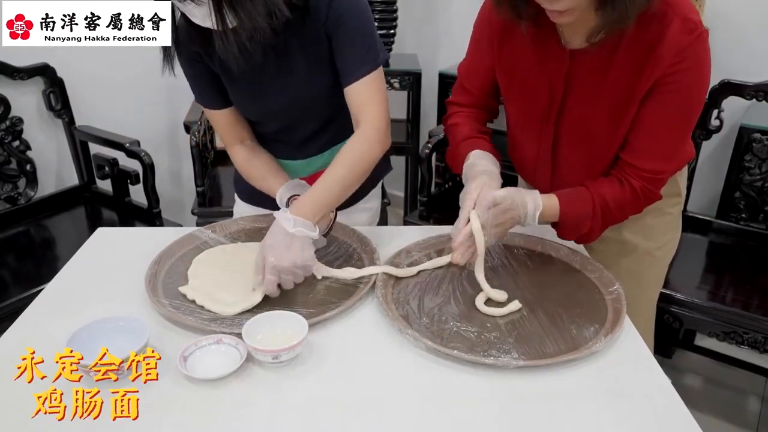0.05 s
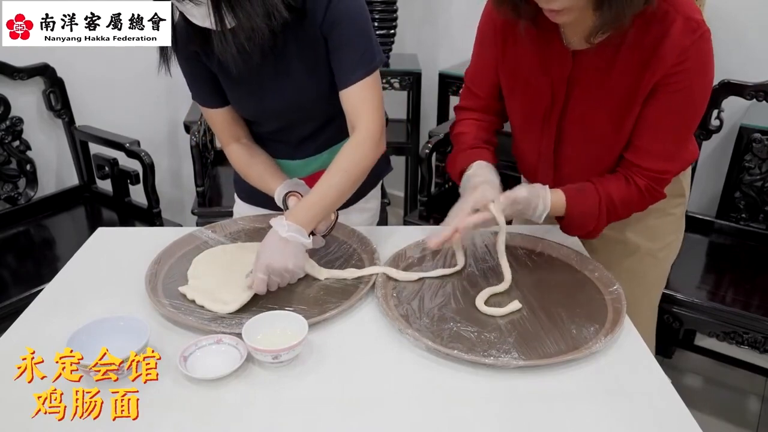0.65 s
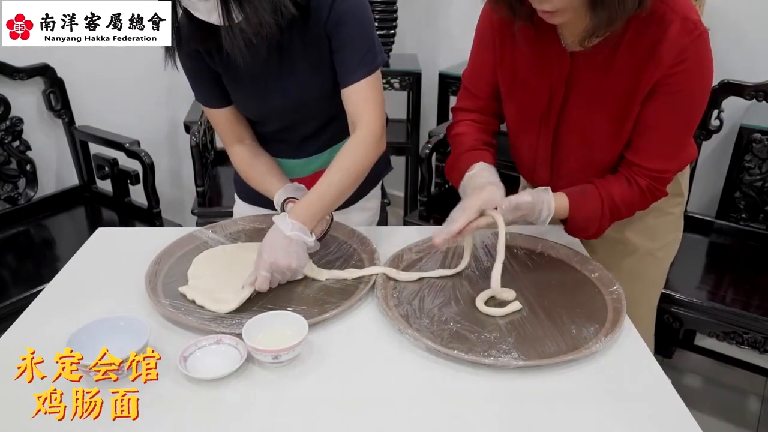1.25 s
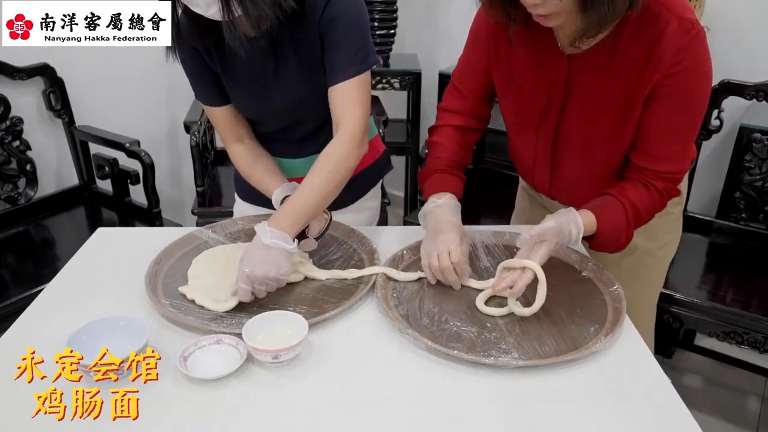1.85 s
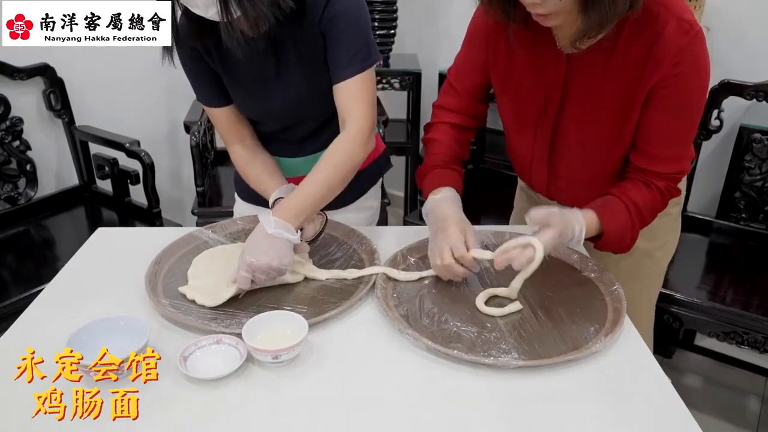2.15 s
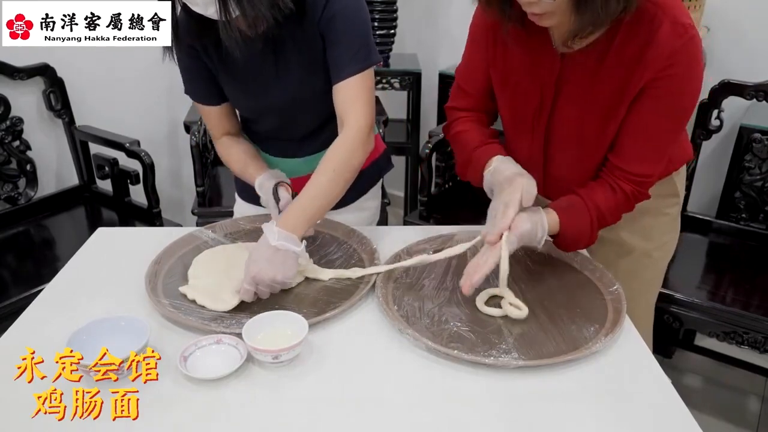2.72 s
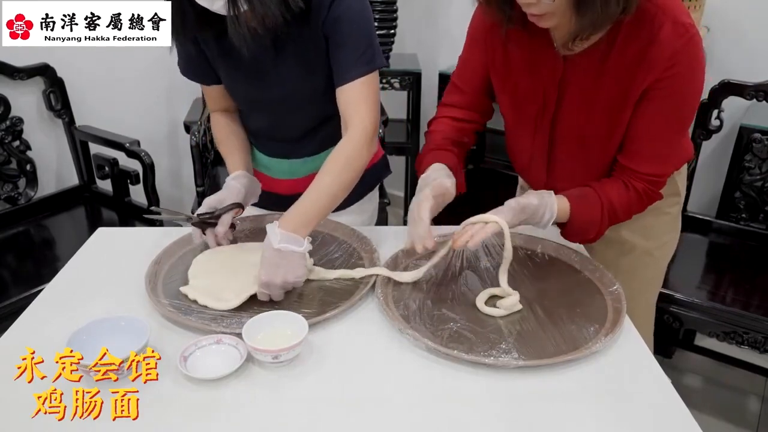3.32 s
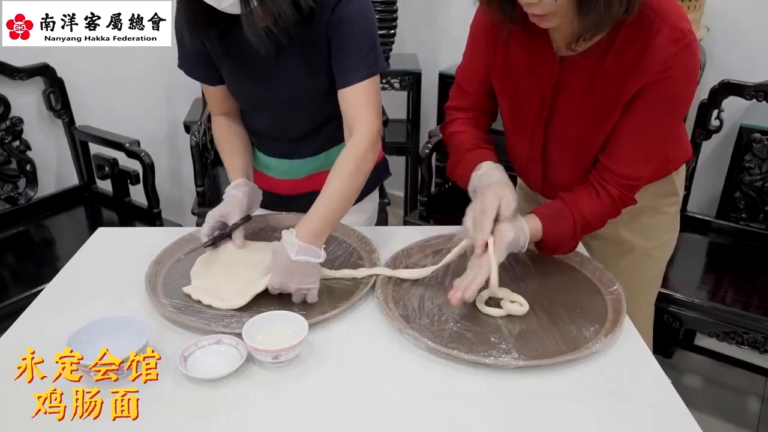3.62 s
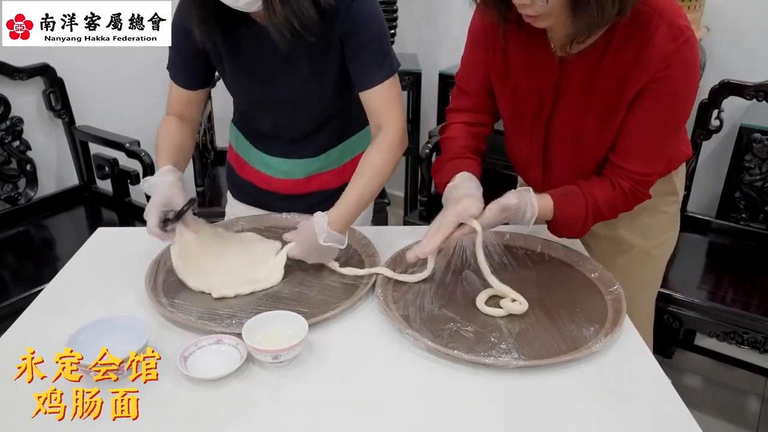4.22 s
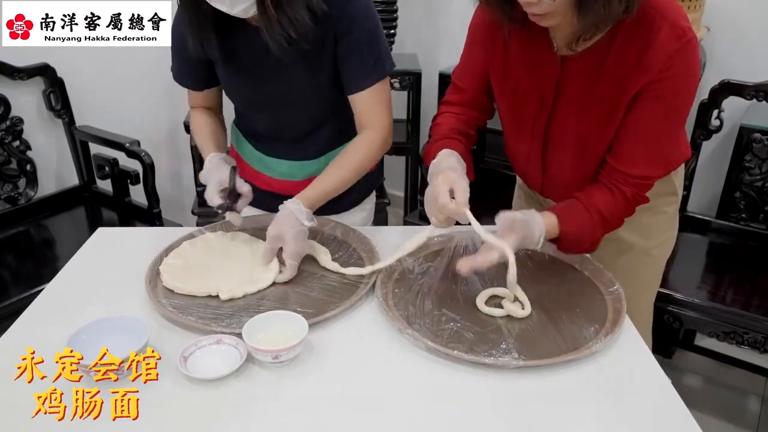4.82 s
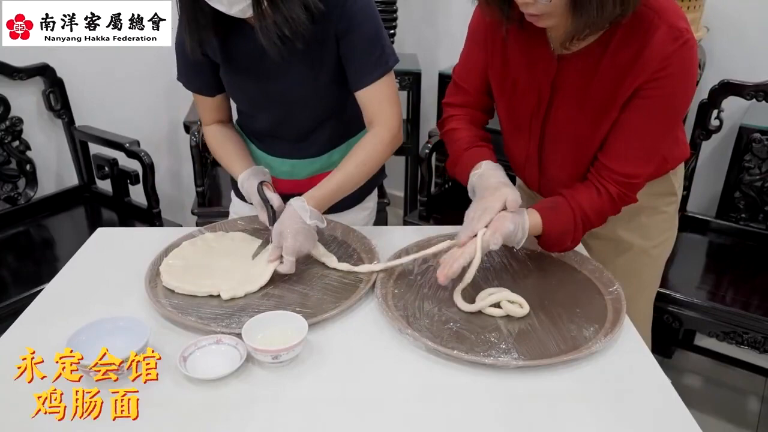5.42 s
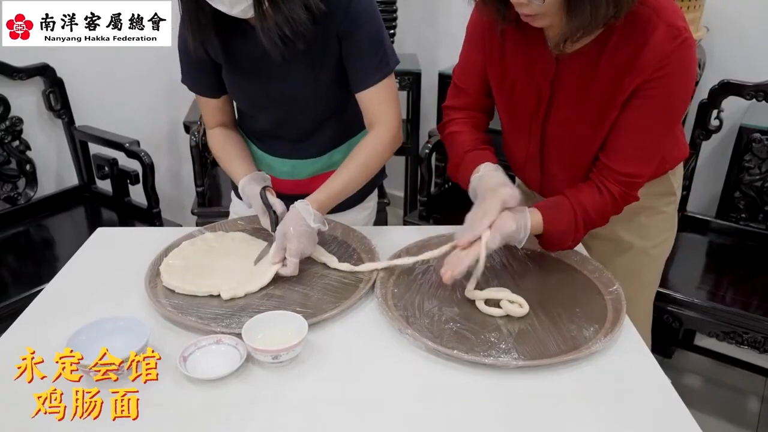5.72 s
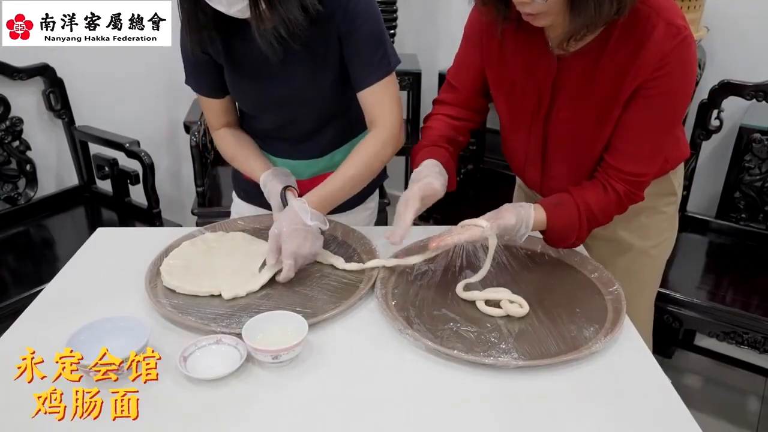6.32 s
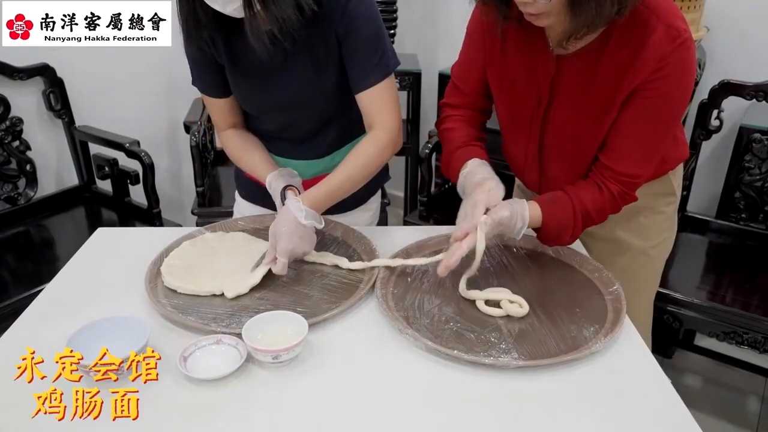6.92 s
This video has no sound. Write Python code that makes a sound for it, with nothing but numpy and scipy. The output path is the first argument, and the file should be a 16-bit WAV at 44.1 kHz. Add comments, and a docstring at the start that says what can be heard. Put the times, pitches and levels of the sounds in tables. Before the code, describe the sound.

A loud, muffled engine drone comes in from outside, slowing and fading over the first couple of seconds. Underneath it, and carrying on throughout, plastic gloves swish and crackle quietly as a rope of dough is rolled between the palms. A knock and a soft, heavy flop of dough on a tray follow, then a scissor click and two quick snips, all heard indoors with slight reverberation and low room hum.

```python
"""Two cooks work dough on trays on a table in a hard-walled room.
From the start an engine outside booms through the walls over a soft hiss, while palms in plastic
gloves roll a rope of dough to and fro, rubbing and crinkling. By 3 s the engine has slowed to a faint
idle and the hiss has faded. Then a slab is lifted and, at 4.3 s, flops onto its tray, exciting its modes.
At 5 s scissors click open, then snip twice; the rolling goes on and the hiss returns."""
import sys
import numpy as np
from scipy import signal
from scipy.fft import rfft, irfft
from scipy.io import wavfile
from scipy.ndimage import uniform_filter1d

SR = 44100
rng = np.random.default_rng(int(sys.argv[2]) if len(sys.argv) > 2 else 0)


def unload_wav(signal):
    """Save mono or channel-first audio to the path in sys.argv[1] as 16-bit WAV at rate SR, clipped to [-1, 1]."""
    wavfile.write(
        sys.argv[1],
        SR,
        np.round(np.clip(np.atleast_2d(signal).T, -1, 1) * 32767).astype(np.int16),
    )


N = 315711
TIME = np.arange(N) / SR

# Levels are relative; spectra give density per hertz.
# firing rate of the engine, which slows, idles and creeps up again: t/s, f/Hz
FIRING_RATE = [(0, 174), (.75, 147), (1.25, 129), (1.65, 114), (2.25, 104.5), (2.9, 98), (4.4, 97),
               (5.5, 104), (7.15, 109)]
# firing tone, booming in swells and then falling away: t/s, level/dB
FIRING_LEVEL = [(0, -7), (.09, -9.5), (.2, -5), (.25, -8), (.38, -7), (.428, -15), (.47, -4), (.51, -1.9),
                (.62, -7), (.7, -22), (.735, -14), (.87, -12.5), (.93, -6.5), (1.1, -3.2), (1.22, -8.5),
                (1.29, -5.5), (1.48, -13), (2.02, -14.5), (2.15, -34), (2.88, -41), (3.05, -31.5),
                (5.1, -33.5), (6, -43), (7.15, -41)]
# how hard and unevenly the engine runs: t/s, lesser tones/dB, rumble/dB, order 1.5/dB, order 0.5/dB
ENGINE_LOAD = [(0, -31, -27, -25, -24.5), (.38, -29, -26, -28, -29), (.51, -44, -24.5, -14.5, -27),
               (.62, -28, -25, -31.5, -40), (.75, -20, -28, -24.5, -46), (1.07, -25.5, -20, -28.5, -60),
               (1.35, -17.5, -23.5, -32, -42), (1.65, -21.5, -25.5, -28.5, -36),
               (2.03, -19.5, -28.5, -17, -44), (2.2, -26, -30, -23.5, -36), (2.38, -29.5, -26.5, -22, -48),
               (2.85, -33.5, -39, -30, -53), (3.1, -34, -34.5, -38, -56), (4, -35.5, -48.5, -40, -56),
               (7.15, -33, -38.5, -47, -66)]
# lesser engine tones: order (multiple of the firing rate), booming level/dB, idling level/dB
LESSER_ORDERS = [(1.27, 2.5, -26), (2, -2, -1.5), (2.499, 0, -17.5), (3.5, -10.5, -16)]
# transmission through the walls: f/Hz, level/dB
WALL_TRANSMISSION = [(25, -22), (40, -22), (65, -27.5), (100, -13), (140, -0.5), (170, -0.5), (215, -8),
                     (300, -24), (345, -12), (380, -23), (420, -11), (520, -22), (1500, -40), (5000, -82)]
# spectrum of the low room tone: f/Hz, level/dB
ROOM_TONE_SPECTRUM = [(15, -47.5), (28, -12), (60, -8), (120, -10.5), (155, -5), (180, -7.5), (205, -4.5),
                      (240, -9), (330, -11.5), (420, -12), (600, -17), (1000, -25.5), (1400, -30),
                      (3000, -80)]
# spectrum of the hiss: f/Hz, level/dB
HISS_SPECTRUM = [(500, -36), (1000, 3), (1500, -4.5), (2200, -1.5), (2900, 2), (3700, -1), (4500, -2),
                 (5200, -8), (8000, -15.5), (11000, -26), (15500, -29.5)]
# the hiss fades and returns: t/s, level/dB
HISS_ENVELOPE = [(0, -40), (.6, -39.5), (1.2, -42), (1.7, -43.5), (2.5, -45.5), (3.4, -48), (4.9, -46.5),
                 (5.7, -46), (6.4, -42.5), (7.15, -39.5)]
# strokes of the palms, to and fro: start t/s, duration/s, level at full speed/dB
PALM_STROKES = [(0, 0.19, -43.5), (0.171, 0.079, -47), (0.264, 0.31, -48.5), (0.55, 0.13, -43.5),
                (0.727, 0.12, -43), (0.846, 0.19, -44.5), (1.035, 0.17, -45), (1.192, 0.18, -45),
                (1.767, .26, -60), (2.033, .2, -50), (2.244, 0.3, -49.5), (2.623, .19, -41),
                (2.82, 0.18, -43), (3.011, 0.17, -42.5), (3.144, 0.15, -42.5), (3.256, 0.11, -52.5),
                (3.424, 0.35, -51), (3.595, 0.2, -44.5), (3.761, 0.2, -42), (3.958, 0.18, -40),
                (4.122, 0.17, -40.5), (4.286, 0.19, -41), (4.457, .15, -40.5), (4.663, 0.21, -49),
                (4.927, 0.22, -47), (5.113, 0.18, -41.5), (5.326, 0.2, -41), (5.501, 0.18, -41.5),
                (5.693, 0.18, -44), (5.84, 0.15, -42), (6.047, 0.12, -41), (6.166, 0.12, -45.5),
                (6.5, 0.19, -44), (6.683, 0.19, -42.5), (6.884, 0.16, -41.5), (7.05, 0.22, -52.5)]
# spectrum of sliding gloves: f/Hz, level/dB
GLOVE_SPECTRUM = [(600, -8.5), (1300, -3.5), (2000, -2), (3000, -0.5), (4300, 5), (5500, 0), (8000, -0.5),
                  (11000, -3.5), (15500, -4.5)]
# spectrum of rasping and snapping plastic: f/Hz, level/dB
PLASTIC_SPECTRUM = [(500, 9), (1100, -6.5), (1900, 7.5), (3000, 1), (4300, 2.5), (5500, -9), (8000, -12.5),
                    (15000, -41.5)]
# buckling of gloves and tray film: t/s, level/dB, decay time/s, fold resonance f/Hz
BUCKLES = [(0.757, -34.5, 0.013, 2140), (1.787, -39.5, 0.015, 4000), (2.09, -43, .014, 10500),
           (2.138, -40.5, .018, 10500), (2.331, -33.5, .018, 4340), (2.37, -42, 0.0095, 4000),
           (2.435, -37.5, 0.018, 3800), (2.627, -29.5, 0.0031, 2800), (2.636, -30, 0.0082, 1840),
           (2.864, -38, .008, 3980), (3.426, -40, .005, 5100), (3.603, -37, .012, 4700),
           (3.669, -30.5, .004, 4440), (3.888, -38, 0.0087, 1900), (4.04, -39, 0.025, 2130),
           (4.061, -33, .011, 1250), (4.311, -34.5, 0.0095, 2370), (4.396, -36, .0092, 2200),
           (4.74, -44, 0.0066, 7060), (5.154, -32, .008, 4260), (6.795, -37, .0095, 2100),
           (6.909, -36, 0.011, 4000)]
# impacts on the tray: t/s, level/dB, contact time/s
TRAY_IMPACTS = [(3.427, -23, 0.0011), (3.6688, -6.5, .0012), (4.283, -25.5, 0.0011), (4.311, -27, 0.00073),
                (4.3151, -8.5, 0.0015), (4.319, 1, 0.0064), (4.331, -19.5, 0.0015), (4.346, -5, .009),
                (4.368, -18, 0.0026)]
# normal modes of tray and table: f/Hz, level/dB, T60/s
TRAY_MODES = [(70, -20, 0.51), (131, -13.5, 0.1), (267, -6.5, 0.026), (311, -4.5, 0.041), (363, -40, 0.2),
              (460, -7, 0.0065), (607, -7.5, 0.016), (815, -9.5, 0.023), (1100, -4, 0.017),
              (2600, -18, .012)]
# the scissors open, then cut twice: click t/s, slide before it/s, slide level/dB, click level/dB
SCISSOR_MOVES = [(4.998, .006, -37.5, -33), (5.583, .03, -43, -31), (5.784, .045, -39, -34)]
# spectrum of the blades: f/Hz, level/dB
BLADE_SPECTRUM = [(700, -5), (1900, 8.5), (3000, 11), (4500, 8), (6500, 4.5), (10000, -10), (15000, 0.5)]
# reverberation time of the room: f/Hz, T60/s
REVERB_TIME = [(100, 0.67), (400, 0.67), (1500, 0.59), (5000, 0.56), (14000, 0.1)]


def gain_of(db):
    """Amplitude ratio: a factor of ten for every 20 dB."""
    return 10 ** (np.asarray(db) / 20)


def unit_rms(x):
    """Normalisation to a mean square of 1."""
    return x / np.sqrt(np.mean(x ** 2) + 1e-20)


def value_at(points, hz):
    """Linear interpolation over log frequency."""
    f, value = np.transpose(points)
    return np.interp(np.log(hz + 1), np.log(f + 1), value)


def curves(rows):
    """Linear interpolation over time of each column of a control table."""
    times, *columns = np.transpose(rows)
    return [np.interp(TIME, times, column) for column in columns]


def add(mix, start_s, sound):
    """Superposition: a sound adds to the mix from its onset."""
    part = mix[round(start_s * SR):][:len(sound)]
    part += sound[:len(part)]


def colour(x, spectrum):
    """Linear filtering that conserves the power of white noise."""
    response = unit_rms(gain_of(value_at(spectrum, np.fft.rfftfreq(N, 1 / SR))))
    return irfft(rfft(x) * response, N)


def noise(spectrum):
    """Stationary Gaussian noise of a given spectrum, rms 1."""
    return unit_rms(colour(rng.standard_normal(N), spectrum))


def drift(rate_hz):
    """Low-pass noise: a slow random fluctuation of rms 1."""
    hz = np.fft.rfftfreq(N, 1 / SR)
    return unit_rms(irfft(rfft(rng.standard_normal(N)) * np.exp(-(hz / rate_hz) ** 2), N))


def engine():
    """Periodic firing gives a tone over a rumble; unequal cylinders add tones between its harmonics."""
    firing_hz, = curves(FIRING_RATE)
    firing_db, = curves(FIRING_LEVEL)
    lesser_db, rumble_db, overtone_db, throb_db = curves(ENGINE_LOAD)
    phase = 2 * np.pi * np.cumsum(firing_hz) / SR

    def tone(order, depth):
        """One engine order under random amplitude and phase modulation."""
        wobble = 1 + depth * (drift(26) + 1j * drift(26))
        carrier = np.exp(1j * (order * phase + 2 * np.pi * rng.random()))
        return np.sqrt(2) * (wobble * carrier).real

    waver = np.interp(TIME, [1.5, 3], [.025, .14])  # steady under load, looser at idle
    out = gain_of(firing_db) * tone(1, waver) + gain_of(throb_db) * tone(.5, waver)
    out += gain_of(overtone_db) * tone(1.5, depth=.2)
    for order, booming_db, idling_db in LESSER_ORDERS:
        order_db = np.interp(TIME, [2.1, 2.4], [booming_db, idling_db])  # the load comes off
        wall_db = value_at(WALL_TRANSMISSION, order * firing_hz)
        out += gain_of(lesser_db + order_db + wall_db) * tone(order, depth=.54)
    return out + gain_of(rumble_db) * noise(WALL_TRANSMISSION)


def background(room_tone_db=-36.5):
    """Filtered noise: a steady low room tone, and a soft hiss that fades and returns."""
    hiss_db, = curves(HISS_ENVELOPE)
    return gain_of(room_tone_db) * noise(ROOM_TONE_SPECTRUM) + gain_of(hiss_db) * noise(HISS_SPECTRUM)


def rubbing_db(resting_db=-61, skew=0.81, speed_exponent=0.84):
    """Friction noise grows as a power of sliding speed; overlapping strokes add in power."""
    power = np.full(N, gain_of(resting_db) ** 2)  # the gloves never lie quite still
    for start, duration, db in PALM_STROKES:
        progress = np.linspace(0, 1, int(duration * SR))
        speed = abs(np.sin(np.pi * progress ** skew))  # fastest a little before mid-stroke
        add(power, start, (gain_of(db) * speed ** speed_exponent) ** 2)
    return 10 * np.log10(power)


def shifting_colour(x, depth_db):
    """Time-varying filtering: random spectral peaks come and go, so the rubbing keeps changing colour."""
    spectra = signal.stft(x, SR, nperseg=512)[2]
    patches = uniform_filter1d(rng.standard_normal(spectra.shape), size=4, axis=0)  # over frequency
    patches = unit_rms(uniform_filter1d(patches, size=7, axis=1))  # over time
    return signal.istft(spectra * gain_of(depth_db * patches), SR, nperseg=512)[1][:N]


def resonate(x, hz, width_hz):
    """A damped resonator whose centre frequency follows the curve hz."""
    carrier = np.exp(2j * np.pi * np.cumsum(hz) / SR)
    pole = np.exp(-np.pi * width_hz / SR)
    baseband = signal.lfilter([(1 - pole) ** 2], [1, -2 * pole, pole * pole], x / carrier)
    return (carrier * baseband).real


def slips(per_s, spread_db):
    """Stick-slip friction: randomly timed impulses of unequal size, rms 1."""
    size = gain_of(spread_db * np.minimum(rng.exponential(1, N), 4))
    return unit_rms(size * rng.standard_normal(N) * (rng.random(N) < per_s / SR))


def rolling_palms(sizzle_db=2.5, rasp_db=-5, chafe_db=-7, coarse_growth=1.67):
    """Sliding friction of thin gloves: a fine sizzle, and coarser slips at the height of each stroke."""
    stroke_db = rubbing_db()
    sizzle = slips(per_s=26000, spread_db=2.5) * gain_of(stroke_db + sizzle_db + 1.36 * drift(70))
    sizzle = shifting_colour(colour(sizzle, GLOVE_SPECTRUM), depth_db=1.7)
    coarse_db = stroke_db.max() + coarse_growth * (stroke_db - stroke_db.max())
    rasp = slips(per_s=2300, spread_db=0.5) * gain_of(coarse_db + rasp_db - drift(40))
    friction = slips(per_s=4000, spread_db=-0.5)
    hollow_hz = 2100 * np.exp(.17 * drift(7.4))  # the hollow between the palms changes size
    chafe = unit_rms(resonate(friction, hollow_hz, width_hz=410)) * gain_of(coarse_db + chafe_db)
    return sizzle + shifting_colour(colour(rasp, PLASTIC_SPECTRUM), depth_db=4) + chafe


def room(x, wet_db):
    """Reverberation: dense reflections of random sign decay exponentially, each band at its own rate."""
    reflections = rng.choice([-1., 1.], SR) * (rng.random(SR) < 3000 / SR)
    reflections *= TIME[:SR] > .006  # gap after the direct sound
    hz, t, spectra = signal.stft(reflections, SR, nperseg=512)
    decay = gain_of(-60 * t / value_at(REVERB_TIME, hz)[:, None])
    tail = signal.istft(spectra * decay, SR, nperseg=512)[1]
    return x + gain_of(wet_db) * signal.fftconvolve(x, tail / np.linalg.norm(tail))[:N]


def crinkles(snap_db=-4, ring_db=-2, attack_s=0.00027):
    """Buckling: plastic gives way in short clumps of snaps, each exciting the resonance of its fold."""
    snaps, rings, t = np.zeros(N), np.zeros(N), TIME[:SR // 4]
    grain = slips(per_s=5000, spread_db=2.0)
    for start, db, decay_s, hz in BUCKLES:
        envelope = gain_of(db) * (1 - np.exp(-t / attack_s)) * np.exp(-t / decay_s)
        clump = envelope * unit_rms(np.roll(grain, -round(start * SR))[:len(t)])
        fold = signal.lfilter(*signal.iirpeak(hz, Q=4, fs=SR), clump)
        add(snaps, start, clump * min(1, (4000 / hz) ** 2))  # the tiniest folds only tick
        add(rings, start, unit_rms(fold) * clump.std())
    return gain_of(snap_db) * colour(snaps, PLASTIC_SPECTRUM) + gain_of(ring_db) * rings


def tray():
    """Modal response to blows of hands and dough: the longer the contact, the lower the modes excited."""
    t, out = TIME[:SR], np.zeros(N)
    ring = -sum(gain_of(db - 60 * t / t60) * np.cos(2 * np.pi * hz * t) for hz, db, t60 in TRAY_MODES)
    for start, db, contact_s in TRAY_IMPACTS:
        force = np.sin(np.pi * np.minimum(t / contact_s, 1)) ** 2
        add(out, start, gain_of(db) * signal.fftconvolve(force / force.sum(), ring))
    return out


def scissors(click_decay_s=.003):
    """Friction, then impact: the blades scrape along each other and stop with a damped click."""
    envelope = np.zeros(N)
    for click_time, slide_s, slide_db, click_db in SCISSOR_MOVES:
        slide = signal.windows.tukey(int((slide_s + 0.016) * SR), .3)
        add(envelope, click_time - slide_s, gain_of(slide_db) * slide)
        add(envelope, click_time, gain_of(click_db) * np.exp(-TIME[:SR // 10] / click_decay_s))
    return colour(envelope * slips(per_s=24000, spread_db=-11.0), BLADE_SPECTRUM)


def scene():
    """Superposition of the reverberant handwork, the engine and the background."""
    handwork = room(rolling_palms(), wet_db=-12)
    handwork += room(crinkles() + scissors(), wet_db=-15)
    handwork += room(tray(), wet_db=-6)
    return (engine() + background() + handwork)[None]


def record(dry, cutoff_hz=15600):
    """Hard clipping flattens the loudest booms; a low-pass filter then limits the band."""
    clipped = np.clip(dry, -1, 1)
    lowpass = signal.firwin(511, cutoff_hz, window=("kaiser", 9), fs=SR)
    return signal.oaconvolve(clipped, lowpass[None], "same")


dry = scene()
out = record(dry)
unload_wav(out)
```